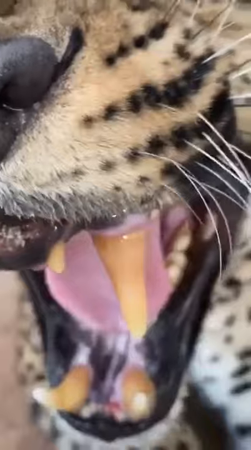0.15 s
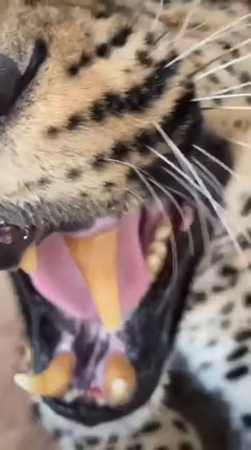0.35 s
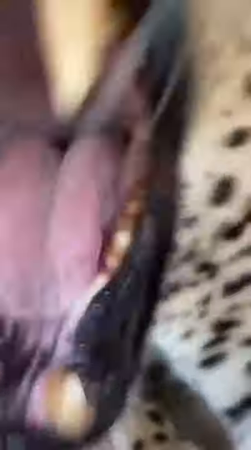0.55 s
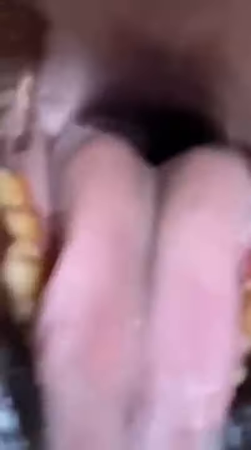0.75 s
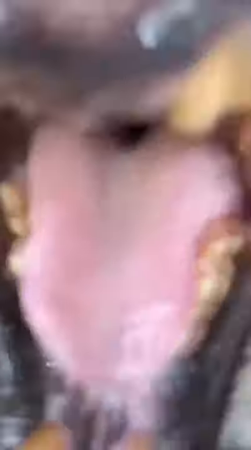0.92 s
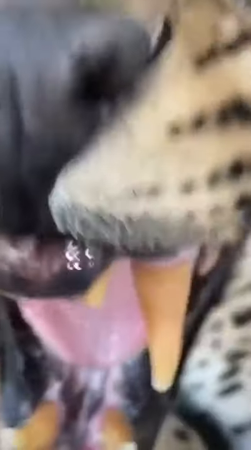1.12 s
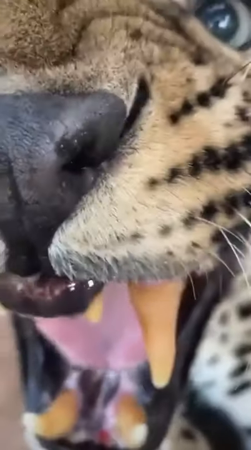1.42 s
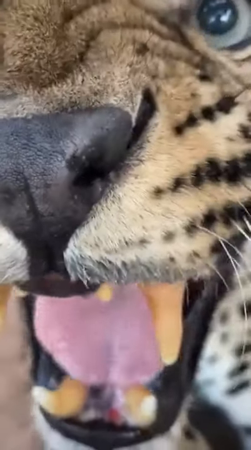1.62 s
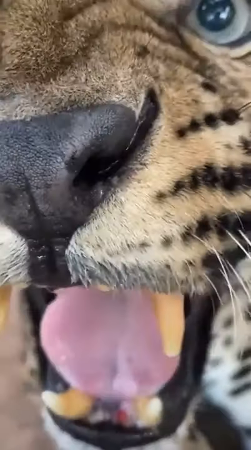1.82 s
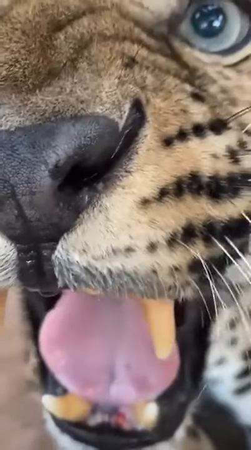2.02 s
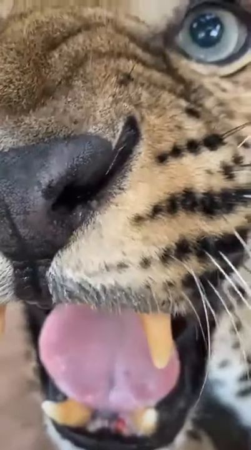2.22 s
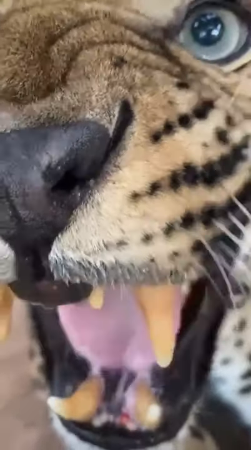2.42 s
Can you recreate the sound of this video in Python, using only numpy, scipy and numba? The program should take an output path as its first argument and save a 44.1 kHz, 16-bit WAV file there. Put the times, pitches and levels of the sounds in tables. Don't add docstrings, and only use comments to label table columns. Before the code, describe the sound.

A leopard growls low, lunges with a harsh roar, rasps a breath in and growls again

```python
import sys
import numpy as np
from scipy import signal
from scipy.fft import rfft, irfft, next_fast_len
from scipy.io import wavfile
from scipy.ndimage import uniform_filter1d
from numba import njit

SR = 44100
rng = np.random.default_rng(int(sys.argv[2]) if len(sys.argv) > 2 else 0)


def linear_from_db(decibels):
    return 10 ** (np.asarray(decibels, float) / 20)


def put_to_file(sound):
    columns = np.atleast_2d(sound).T
    safe = np.clip(columns, -1, 1)
    whole_steps = np.round(safe * 32767)
    wavfile.write(sys.argv[1], SR, whole_steps.astype(np.int16))


N = 112454

# f/Hz, level/dB
YARD_SPECTRUM = [(24, -42), (40, -3), (76, -1.5), (271, -4), (487, -19), (1070, -30), (1240, -22),
                 (1580, -35), (14000, -53)]
# f/Hz, side minus mid level/dB
SIDE_SPECTRUM = [(60, -79), (110, -64), (200, -36), (370, -22), (670, -19), (1230, -29), (2250, -13),
                 (4120, -7), (8000, -5), (13800, -5)]
# start t/s, end t/s, f/Hz, level/dB
WHEEZES = [(1.645, 1.715, 1300, -72), (2.37, 2.5, 800, -69), (.582, .598, 1230, -28),
           (.601, .615, 1150, -31), (.642, .658, 1190, -28), (.664, .676, 1330, -31),
           (.572, .61, 2080, -36), (.69, .77, 1770, -39), (.75, .766, 950, -36), (.599, .608, 3520, -28),
           (.756, .764, 3600, -29), (.33, .4, 4700, -60), (.405, .425, 4500, -54), (2.504, 2.56, 1610, -60),
           (2.445, 2.5, 1610, -70), (2.378, 2.43, 260, -49)]
# f/Hz, level/dB
AIR_SPECTRUM = [(290, 18.5), (500, 1.5), (840, -7.5), (1620, -12.5), (2060, -19), (2440, -15),
                (8020, -11.5), (12700, -27.5), (14200, -42)]
# f/Hz, width/Hz, level/dB
GROWL_MOUTH = [(1148, 46, -11), (1600, 18.2, -5), (2873, 26.7, -6), (3850, 150, -8.5), (4458, 64, -7),
               (5860, 450, -5), (9260, 320, -37.5)]
ROAR_MOUTH = [(1133, 150, -9), (1760, 560, -3.5), (2350, 250, -17), (2783, 180, -6.5), (3580, 440, 0),
              (4193, 87, -12), (5340, 230, -16.5), (6270, 250, -9)]
INHALE_MOUTH = [(1223, 266, 3), (1620, 70, -6.5), (2460, 370, -2.5), (3030, 40, -16.5), (3490, 480, -1.5),
                (4790, 190, -16), (5850, 460, -5), (7500, 140, -38.5)]
# f/Hz, level/dB
ROAR_SHADE = [(500, 0), (2650, 3), (2980, -16), (3250, 0), (6600, 1.5), (7800, -6.5), (10000, 0),
              (13000, -1)]
# t/s, peak level/dB
SLAPS = [(1.721, -43), (1.7404, -36), (1.767, -40), (1.8417, -24), (1.8881, -24), (1.9426, -29.5),
         (2.0228, -31), (2.1127, -32.5), (2.1629, -32), (2.1943, -30), (2.232, -31.5), (2.2717, -35.5)]
# t/s, peak level/dB
PLACED_SNAPS = [(0.0342, -31), (0.172, -37), (0.2083, -33), (0.3107, -23.5), (0.381, -32), (0.4428, -29.5),
                (0.5087, -19.5), (0.5318, -13), (0.5577, -18), (0.5812, -16), (0.599, -6), (0.6227, -10),
                (0.6443, -6.5), (0.6666, -4), (0.6903, -33), (0.7106, -11.5), (0.7347, -16), (0.757, -8),
                (0.7792, -18.5), (0.803, -26), (0.8258, -37), (0.852, -36), (0.88, -53.5), (0.905, -22.5),
                (0.933, -36), (0.964, -28.5), (0.991, -22.5), (1.0188, -35), (1.051, -26), (1.1168, -31.5),
                (1.1491, -40.5), (1.2199, -36.5), (1.255, -44), (1.3909, -44), (1.4341, -31), (1.4747, -37.5),
                (1.509, -40), (1.5582, -44.5), (1.814, -32), (1.856, -53), (1.9014, -23), (1.978, -46),
                (2.051, -33.5), (2.136, -35), (2.176, -57), (2.245, -34), (2.297, -44), (2.386, -77),
                (2.437, -65), (2.5039, -44)]
# t/s, level/dB
PUSHES = [(.508, 4), (.535, 3), (.6, 3), (.645, -11.5), (.691, 2.5), (.711, 3), (.83, -2.5), (.994, 3),
          (1.815, 3.5), (1.857, -1), (1.9, 3), (2.01, -1), (2.135, -1), (2.27, -4), (2.505, 5)]
# t/s, f/Hz
RIB_TRACK = [
    (0, 172),
    (.8, 189),
    (.9, 148),
    (1.1, 144),
    (1.5, 183.6),
    (1.75, 193.5),
    (2.55, 183.3),
]
# t/s, chest level/dB, throat f/Hz, tongue f/Hz, throat level/dB, air level/dB
VOICE = [(0, -35, 300, 1590, -52, -53.5), (.13, -34, 310, 1563, -54, -56.5),
         (.19, -32, 310, 1601, -47.5, -50.5), (.48, -33, 300, 1612, -47.5, -50),
         (.545, -27, 170, 1793, -33, -32.5), (.61, -25, 255, 2140, -23, -23.5),
         (.665, -27, 385, 1770, -18.5, -23), (.8, -27, 365, 1734, -21.5, -29),
         (.96, -29.5, 325, 1550, -37.5, -39), (1.21, -34, 315, 1692, -44.5, -53.5),
         (1.55, -39, 310, 1922, -45, -57.5), (1.62, -68, 290, 1692, -61, -83.5),
         (1.75, -43, 290, 1730, -79, -48), (1.83, -36.5, 300, 1620, -36.5, -46),
         (1.93, -30, 300, 1620, -38.5, -44), (2.3, -34.5, 290, 1685, -44, -53),
         (2.37, -47.5, 260, 1626, -70, -69.5), (2.48, -48, 180, 1600, -41.5, -74.5),
         (2.55, -43.5, 180, 1564, -47, -62)]
# t/s, closures f/Hz
FLAPS = [(0.0, 28.87), (0.35, 29.15), (0.49, 31.99), (0.55, 44.93), (0.78, 43.65), (0.9, 37.37),
         (1.05, 31.03), (1.35, 27.75), (1.56, 23.31), (1.8, 22.85), (2.02, 27.03), (2.13, 22.77),
         (2.27, 34.64), (2.4, 18.69), (2.55, 33.05)]

ROAR_S, ROAR_EDGE_S = (.53, .86), .04
INHALE_S, INHALE_EDGE_S = (1.715, 2.345), .01
HOLD_S, HOLD_DB = (1.585, 1.719), -30
YARD_DB, REFLECT_S, SIDE_AIR_DB = -58, .016, -5
WHEEZE_WIDTH_HZ, WHEEZE_WIDTH_SHARE, WHEEZE_EDGE_S = 45, .04, .01
PUFF_S, AIR_RING_DB, AIR_PATCHY_DB, AIR_DB = .0025, 0, 2.5, -3.5
PUFF_REST, PUFF_REST_INHALE, PUFF_REST_ROAR = .35, .6, .4
TONGUE_REST_HZ, TONGUE_PULL = 1600, (.3, 1.0, .45)
GROWL_WIDER, RELAXED_WIDER, MOUTH_FLICKER_DB = 1.5, 2.4, 3
TWIN_RATIO, TWIN_WIDTH_HZ, TWIN_DB, TWIN_S = 1.13, 80, -3, (1.03, 1.6)
SNAP_DB, SNAP_SPREAD_DB, SNAP_RING_DB = -11, .5, -10
CRACK_S, CRACK_DB, CRACK_COLOUR_DB = .0015, -26.5, 6.5
RASPS_PER_S, RASP_DB, RASP_SPREAD_DB = 90, -5, 3.5
NOSE_HZ, NOSE_WIDTH_HZ, NOSE_DB, CALM_NOSE_DB = 682, 260, -18, -10
NOSE_INHALE_HZ, NOSE_INHALE_DB = 445, -3
JAW_S, JAW_HZ, JAW_WIDTH_HZ, JAW_DB = (.615, .665), 398, 260, 4
GAPE_S, GAPE_HZ, GAPE_WIDTH_HZ, GAPE_DB = (.55, .662), 268.5, 66, -1
TENSE_S, TENSE_EDGE_S = (.662, .87), .012
THROAT_WIDTH_HZ, SLACK_WIDTH_HZ = 72, 130
RIB_ROAR_S, RIB_LAG_S, RIB_WIDTH_HZ = (.53, 1.07), .0039, 93
RIB_DB, RIB_INHALE_DB, RIB_ROAR_DB = -7.5, 8, 4.5
CHEST_HZ, CHEST_WIDTH_HZ, CHEST_LAG_S = 99, 52.5, .009
REST_FLAPS_HZ, CHEST_PULL = 29, .4
CHEST_ROUGH, THROAT_ROUGH, INHALE_ROUGH = .4, .4, .3
FLAP_SPREAD_DB, FLAP_JITTER_S = 2.0, .0008
LOW_CUT_HZ, CUTOFF_HZ, TOP = 52, 14300, .5


def rms_one(x):
    return x / np.sqrt(np.mean(x ** 2) + 1e-20)


def in_time(rows):
    s, *columns = np.transpose(rows)
    return [np.interp(np.arange(N) / SR, s, c) for c in columns]


def window(span_s, edge_s):
    t = np.arange(N) / SR
    return np.clip(np.minimum(t - span_s[0], span_s[1] - t) / edge_s + .5, 0, 1)


def sample_at(s):
    return np.clip((s * SR).astype(int), 0, N - 1)


def train(s, sizes):
    out = np.zeros(N)
    out[sample_at(s)] = sizes
    return out


def fading(clicks, decay_s):
    return signal.lfilter([1], [1, -np.exp(-1 / (decay_s * SR))], clicks + 1e-18)


def colour(x, points):
    hz, db = np.transpose(points)
    size = next_fast_len(len(x) + 4096)
    at = np.log(np.arange(size // 2 + 1) * SR / size + 1)
    gain = linear_from_db(np.interp(at, np.log(hz + 1), db))
    return irfft(rfft(x, size) * gain, size)[:N]


@njit
def recurse(x, a1, a2):
    y = x.copy()
    for i in range(2, len(x)):
        y[i] += a1[i] * y[i - 1] - a2 * y[i - 2]
    return y


def ring(x, hz, width_hz):
    r = np.exp(-np.pi * width_hz / SR)
    w = 2 * np.pi * hz * np.ones(N) / SR
    return recurse(np.sin(w) * x + 1e-18, 2 * r * np.cos(w), r * r)


def swell(x, hz, width_hz):
    return rms_one(ring(ring(x, hz, width_hz), hz, width_hz))


def flutter(size):
    once = uniform_filter1d(rng.standard_normal(N), size=size)
    return rms_one(uniform_filter1d(once, size=size))


def patchy(x, patchy_db, size):
    edges = np.geomspace(500, 15000, num=9)
    out = 0
    for band in zip(edges, edges[1:]):
        sos = signal.butter(2, band, "band", fs=SR, output="sos")
        out = out + linear_from_db(patchy_db * flutter(size)) * signal.sosfilt(sos, x)
    return out


def yard():
    return linear_from_db(YARD_DB) * rms_one(colour(rng.standard_normal(N), YARD_SPECTRUM))


def reflections(voiced):
    echo = rng.standard_normal(3000) * np.exp(-np.arange(3000) / (REFLECT_S * SR))
    return signal.fftconvolve(voiced, echo / np.sqrt(np.sum(echo ** 2)))[:N]


def wheezes():
    out = 0
    for start, end, hz, db in WHEEZES:
        width_hz = WHEEZE_WIDTH_HZ + WHEEZE_WIDTH_SHARE * hz
        gate = window((start, end), WHEEZE_EDGE_S)
        whistle = gate * ring(ring(rng.standard_normal(N), hz, width_hz), hz, width_hz)
        out = out + linear_from_db(db) * rms_one(whistle) * np.sqrt(np.mean(gate ** 2))
    return out


def mouth_flicker(db):
    return linear_from_db(db + MOUTH_FLICKER_DB * flutter(size=500))


def mouth(x, tongue_hz):
    roar = window(ROAR_S, ROAR_EDGE_S)
    inhale = window(INHALE_S, INHALE_EDGE_S)
    relaxed = window((ROAR_S[1], HOLD_S[0]), ROAR_EDGE_S)
    twin = x * window(TWIN_S, ROAR_EDGE_S)
    out = -linear_from_db(TWIN_DB) * ring(twin, TWIN_RATIO * tongue_hz, TWIN_WIDTH_HZ)
    for k, (hz, width_hz, db) in enumerate(GROWL_MOUTH):
        pull = TONGUE_PULL[k] if k < 3 else 0
        moved_hz = hz * (tongue_hz / TONGUE_REST_HZ) ** pull
        caught = x * mouth_flicker(db) * (1 - roar - inhale)
        firm = ring(caught * (1 - relaxed), moved_hz, GROWL_WIDER * width_hz)
        loose = ring(caught * relaxed, moved_hz, RELAXED_WIDER * width_hz)
        out = out + (-1) ** k * (firm + np.sqrt(RELAXED_WIDER) * loose)
    for share, shape in ((roar, ROAR_MOUTH), (inhale, INHALE_MOUTH)):
        for k, (hz, width_hz, db) in enumerate(shape):
            centre_hz = tongue_hz if k == 1 else hz
            out = out + (-1) ** k * ring(x * share * mouth_flicker(db), centre_hz, width_hz)
    return out


def air(s, chance, air_db, tongue_hz):
    rest = PUFF_REST + (PUFF_REST_INHALE - PUFF_REST) * window(INHALE_S, INHALE_EDGE_S)
    rest = rest + (PUFF_REST_ROAR - PUFF_REST) * window(ROAR_S, ROAR_EDGE_S)
    bursts = fading(train(s, linear_from_db(SNAP_SPREAD_DB * chance[:, 3])), PUFF_S)
    puffs = rest + (1 - rest) * bursts
    noise = puffs * linear_from_db(2.0 * flutter(size=150)) * rng.standard_normal((2, N))
    broad = rms_one(patchy(colour(noise[0], AIR_SPECTRUM), AIR_PATCHY_DB, size=400))
    mouthed = rms_one(mouth(puffs * noise[1], tongue_hz))
    level_db = air_db + AIR_DB + HOLD_DB * window(HOLD_S, .002)
    return linear_from_db(level_db) * (broad + linear_from_db(AIR_RING_DB) * mouthed)


def snaps(s, placed, chance, air_db, tongue_hz):
    db = air_db[sample_at(s)] - SNAP_DB + SNAP_SPREAD_DB * chance[:, 2].clip(-2, 1)
    db[placed] = np.transpose(PLACED_SNAPS)[1]
    rasping = window(ROAR_S, ROAR_EDGE_S) + 2 * window(INHALE_S, INHALE_EDGE_S)
    rasps = rng.random(N) < RASPS_PER_S / SR * rasping
    rasp_db = air_db - RASP_DB + RASP_SPREAD_DB * rng.standard_normal(N)
    slap_s, slap_db = np.transpose(SLAPS)
    clicks = train(s, linear_from_db(db)) + rasps * linear_from_db(rasp_db) + train(slap_s, linear_from_db(slap_db))
    clicks = clicks * linear_from_db(HOLD_DB * window(HOLD_S, .003))
    crack = uniform_filter1d(fading(clicks, CRACK_S), size=40, origin=19) * rng.standard_normal(N)
    soft = uniform_filter1d(clicks, size=4, origin=1) * 2
    rung = mouth(.43 * soft + .17 * crack, tongue_hz)
    return linear_from_db(SNAP_RING_DB) * rung + linear_from_db(CRACK_DB) * patchy(crack, CRACK_COLOUR_DB, size=300)


def nose(drive):
    calm = window((INHALE_S[1], 3), ROAR_EDGE_S)
    inhale = window(INHALE_S, ROAR_EDGE_S)
    jaws = window(JAW_S, TENSE_EDGE_S)
    out = linear_from_db(NOSE_DB + CALM_NOSE_DB * calm) * swell(drive, NOSE_HZ, NOSE_WIDTH_HZ)
    out = out + linear_from_db(NOSE_INHALE_DB) * inhale * swell(drive, NOSE_INHALE_HZ, THROAT_WIDTH_HZ)
    return out + linear_from_db(JAW_DB) * jaws * swell(drive, JAW_HZ, JAW_WIDTH_HZ)


def throat(drive, throat_hz):
    tense = window(TENSE_S, TENSE_EDGE_S)
    gape = window(GAPE_S, TENSE_EDGE_S)
    out = tense * swell(drive, throat_hz, THROAT_WIDTH_HZ)
    out = out + (1 - tense - gape) * swell(drive, throat_hz, SLACK_WIDTH_HZ)
    return out + linear_from_db(GAPE_DB) * gape * swell(drive, GAPE_HZ, GAPE_WIDTH_HZ)


def ribs(drive):
    db = RIB_DB + RIB_INHALE_DB * window(INHALE_S, ROAR_EDGE_S)
    db = db + RIB_ROAR_DB * window(RIB_ROAR_S, ROAR_EDGE_S)
    late = np.roll(drive, int(RIB_LAG_S * SR))
    return linear_from_db(db) * swell(late, in_time(RIB_TRACK)[0], RIB_WIDTH_HZ)


def chest(s, chance, rumble):
    slowness = (REST_FLAPS_HZ / np.interp(s, *np.transpose(FLAPS))).clip(0, 1)
    thumps = train(s + CHEST_LAG_S * slowness ** 2, linear_from_db(FLAP_SPREAD_DB * chance[:, 1]))
    hz = CHEST_HZ * (in_time(FLAPS)[0] / REST_FLAPS_HZ).clip(1) ** CHEST_PULL
    return swell(rms_one(thumps) + CHEST_ROUGH * rumble, hz, CHEST_WIDTH_HZ)


def body(s, chance, chest_db, throat_hz, throat_db):
    push_db = FLAP_SPREAD_DB * chance[:, 1]
    pushed = [np.argmin(abs(s - at)) for at, db in PUSHES]
    push_db[pushed] = np.transpose(PUSHES)[1]
    push = train(s, linear_from_db(push_db))
    rough = 1 + INHALE_ROUGH / THROAT_ROUGH * window(INHALE_S, ROAR_EDGE_S)
    rumble = rough * rms_one(fading(push, PUFF_S) + PUFF_REST) * rng.standard_normal((2, N))
    drive = rms_one(push) + THROAT_ROUGH * rumble[1]
    trunk = chest(s, chance, rumble[0]) - ribs(drive)
    return linear_from_db(chest_db) * trunk + linear_from_db(throat_db) * (throat(drive, throat_hz) - nose(drive))


def closures():
    turns = np.cumsum(in_time(FLAPS)[0]) / SR
    s = np.interp(np.arange(int(turns[-1]) + 1), turns, np.arange(N) / SR)
    chance = rng.standard_normal((len(s), 4))
    s += FLAP_JITTER_S * chance[:, 0]
    placed = [np.argmin(abs(s - at)) for at, db in PLACED_SNAPS]
    s[placed] = np.transpose(PLACED_SNAPS)[0]
    chance[placed, 1] /= 2
    return s, placed, chance


def scene():
    chest_db, throat_hz, tongue_hz, throat_db, air_db = in_time(VOICE)
    s, placed, chance = closures()
    voiced = body(s, chance, chest_db, throat_hz, throat_db)
    voiced = voiced + snaps(s, placed, chance, air_db, tongue_hz) + wheezes()
    cat = voiced + air(s, chance, air_db, tongue_hz)
    cat = cat + window(ROAR_S, ROAR_EDGE_S) * (colour(cat, ROAR_SHADE) - cat)
    mid = cat + yard()
    side_air = linear_from_db(SIDE_AIR_DB) * air(s, chance, air_db, tongue_hz)
    side = colour(reflections(voiced) + side_air, SIDE_SPECTRUM)
    return np.array([mid + side, mid - side])


def low_pass(x):
    return signal.sosfilt(signal.butter(12, 14390, fs=SR, output="sos"), x)


def record(dry):
    low_cut = signal.butter(2, LOW_CUT_HZ, "high", fs=SR, output="sos")
    high_cut = signal.cheby2(12, 60, CUTOFF_HZ, fs=SR, output="sos")
    rounded = TOP * np.tanh(signal.sosfilt(low_cut, dry) / TOP)
    return low_pass(signal.sosfilt(high_cut, rounded))


dry = scene()
out = record(dry)
put_to_file(out)
```